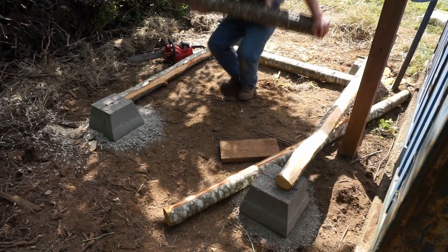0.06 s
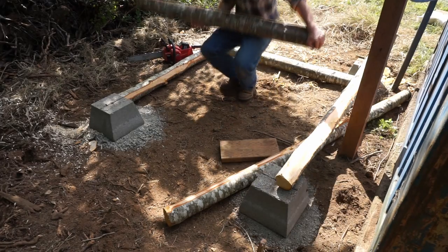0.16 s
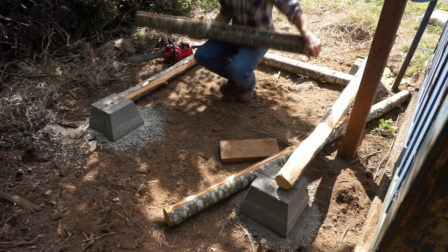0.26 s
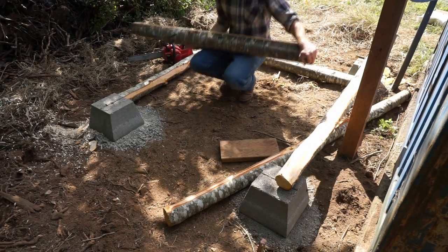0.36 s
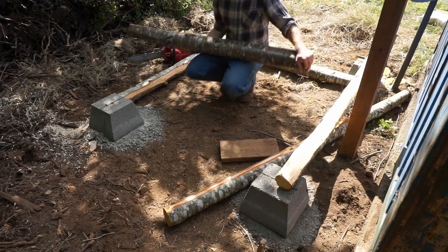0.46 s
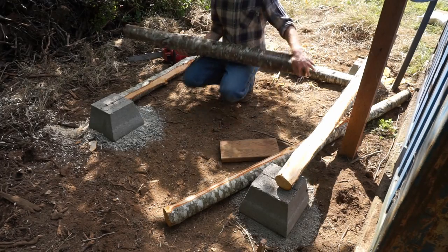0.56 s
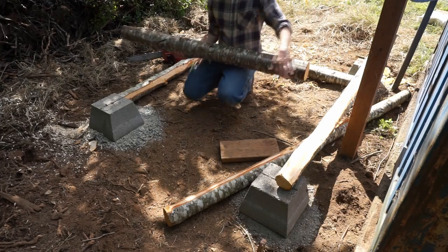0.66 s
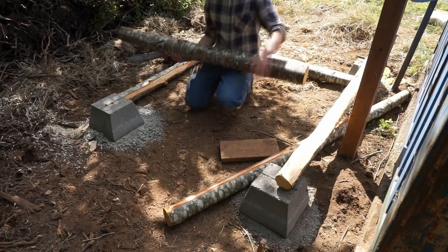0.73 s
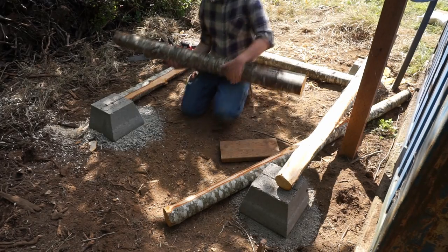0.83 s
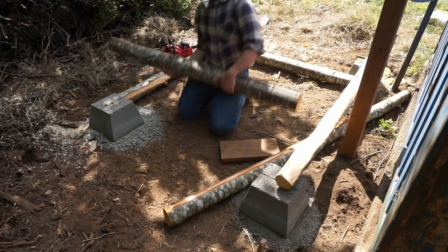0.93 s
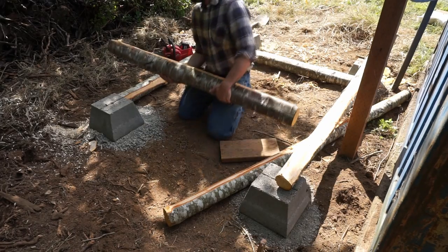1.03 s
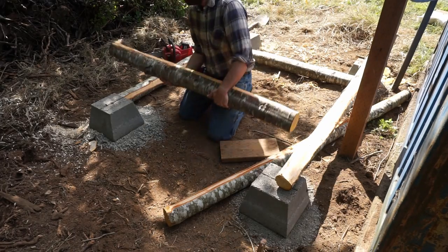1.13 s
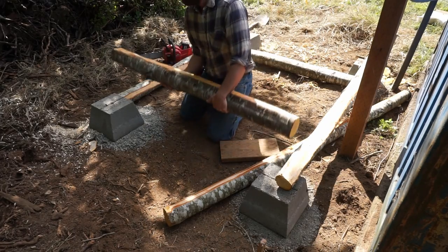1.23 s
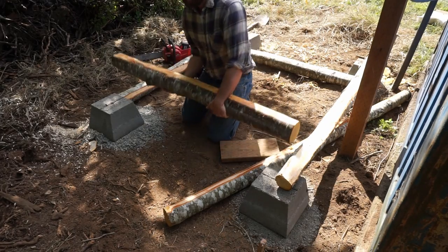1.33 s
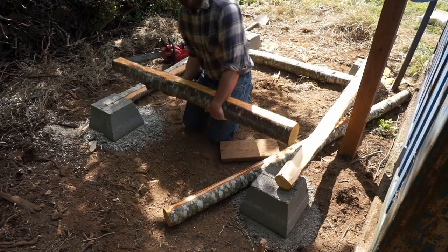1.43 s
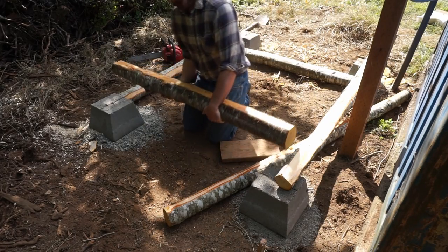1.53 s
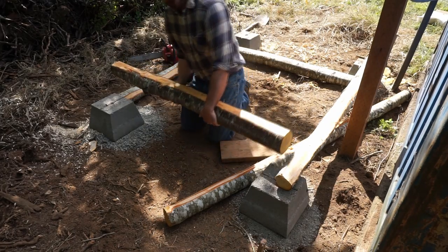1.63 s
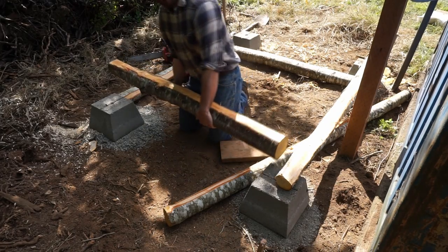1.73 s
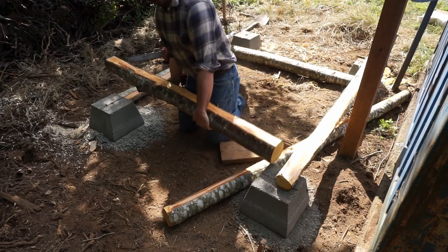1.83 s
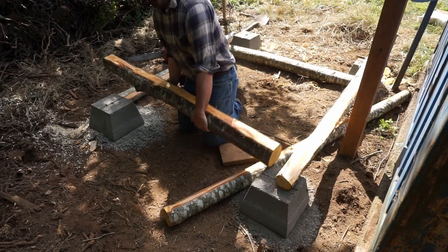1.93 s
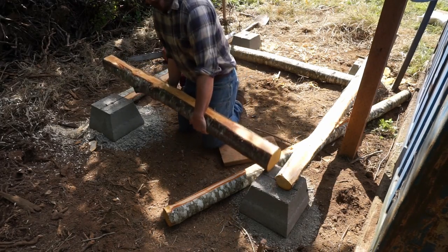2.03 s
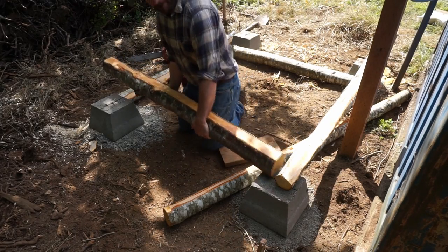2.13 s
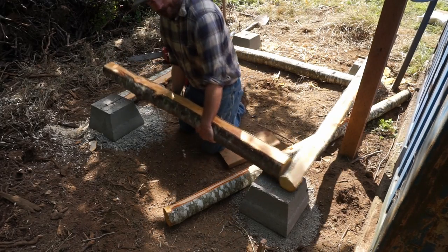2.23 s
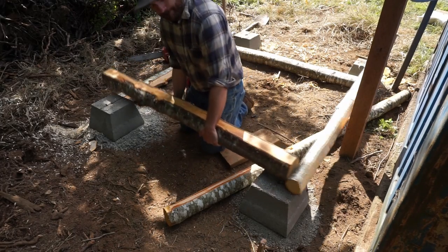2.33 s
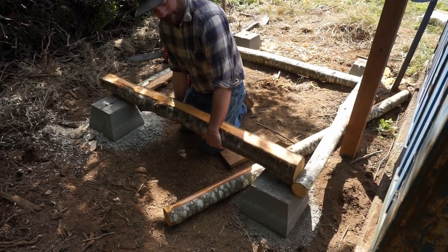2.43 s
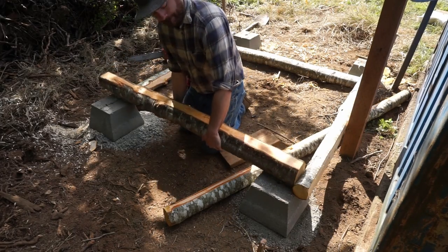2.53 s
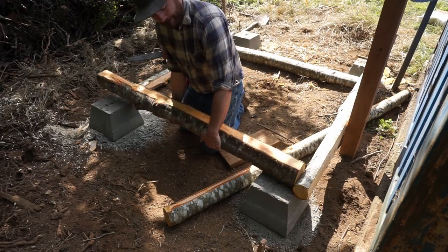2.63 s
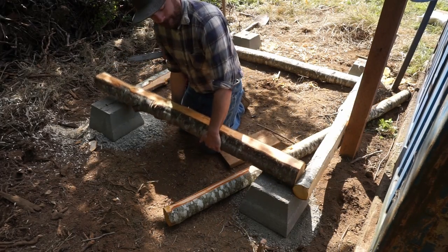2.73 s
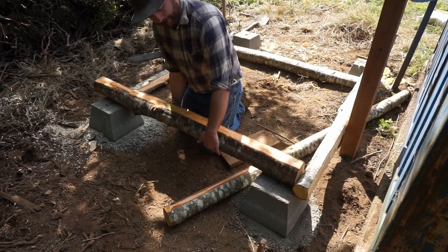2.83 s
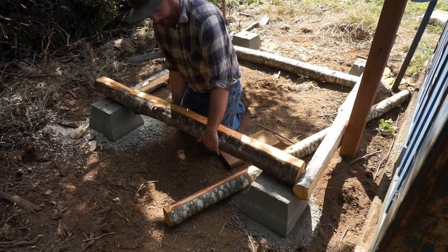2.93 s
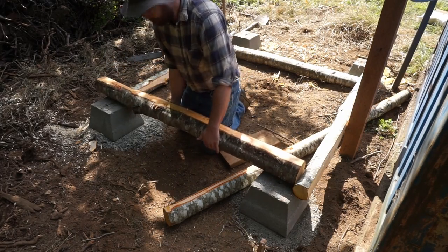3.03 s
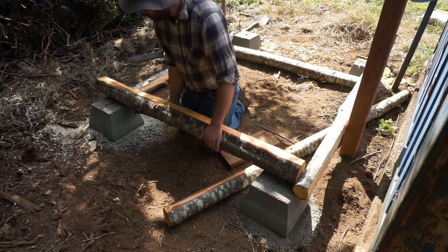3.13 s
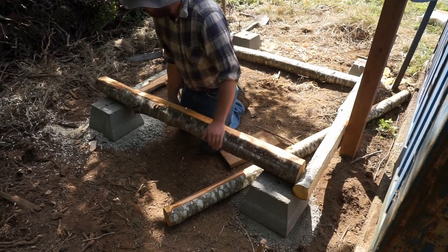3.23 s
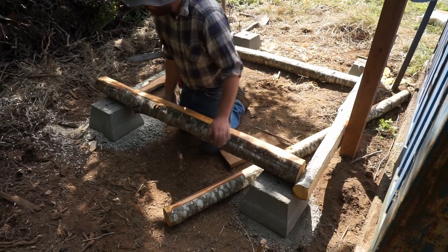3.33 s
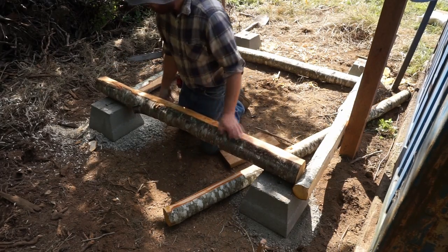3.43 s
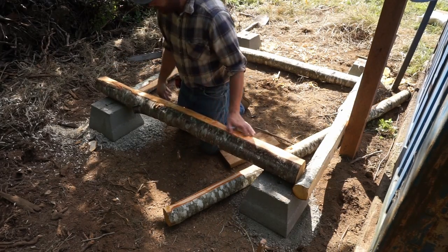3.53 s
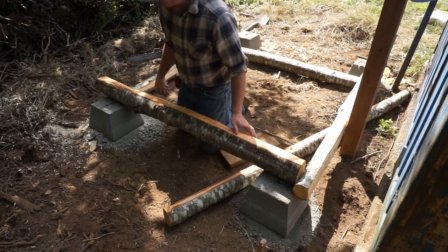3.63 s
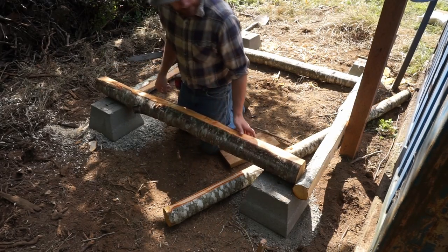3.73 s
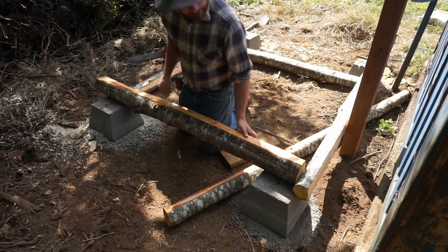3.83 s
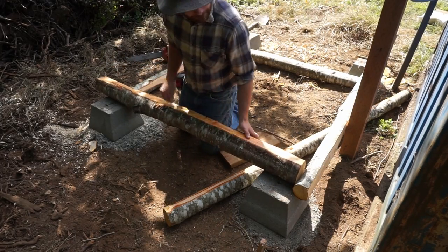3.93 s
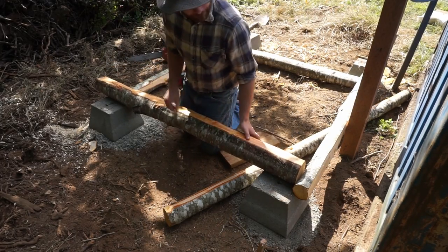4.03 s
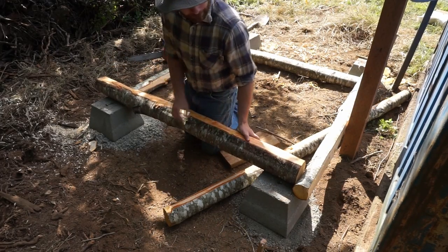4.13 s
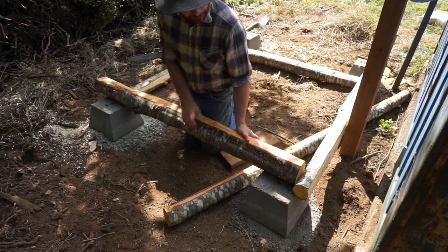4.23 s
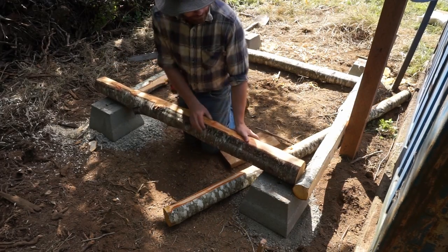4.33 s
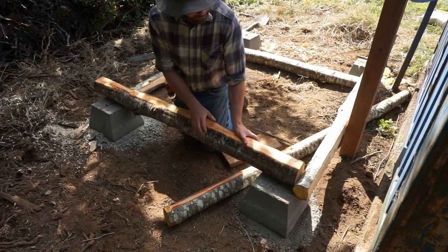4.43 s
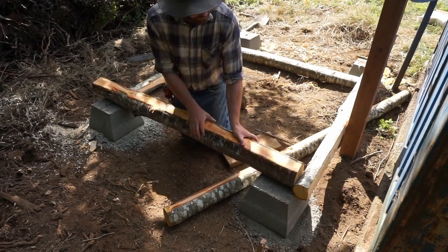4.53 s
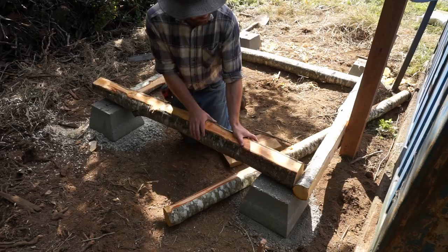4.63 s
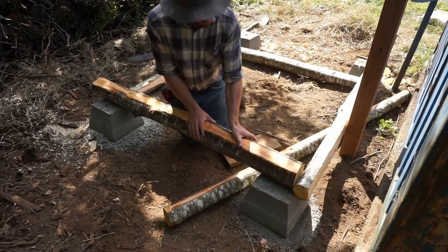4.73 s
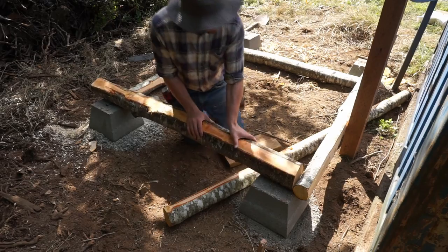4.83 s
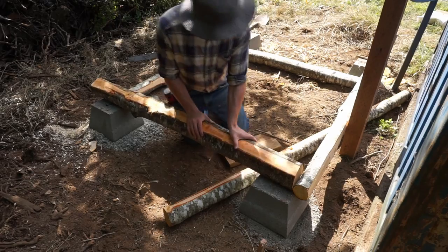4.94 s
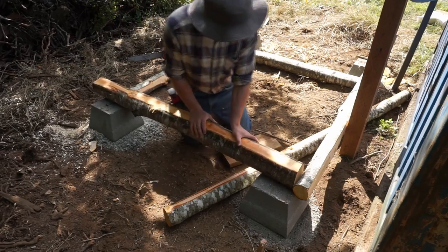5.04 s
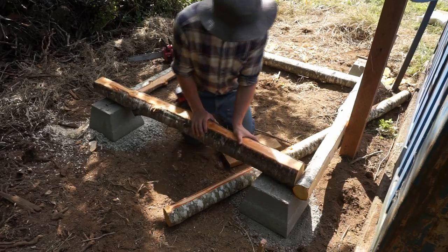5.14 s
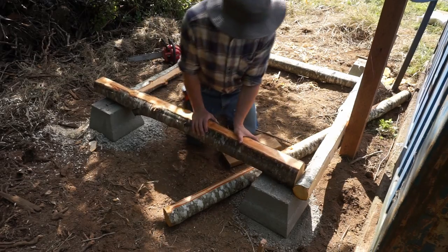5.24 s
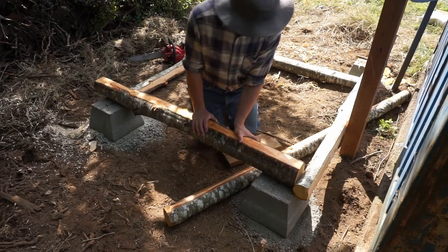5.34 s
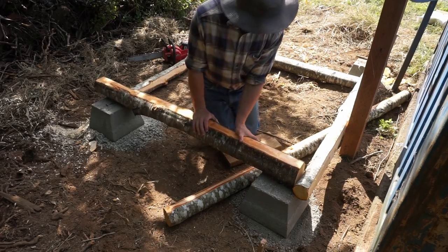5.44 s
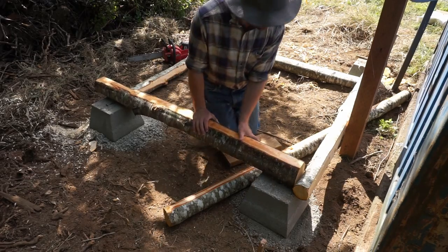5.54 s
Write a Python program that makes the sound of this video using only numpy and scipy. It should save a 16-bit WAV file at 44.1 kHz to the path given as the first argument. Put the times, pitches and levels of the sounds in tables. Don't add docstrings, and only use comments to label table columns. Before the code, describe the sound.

Close outdoor sound over low distant traffic and leaf hiss: boots scuff dry soil, a board taps, bark squeaks faintly in gripping hands and a twig snaps very loudly. A heavy log then knocks woodenly against another log, lands on concrete with a harder, gritty clack, and drops once more with a hollow ring. Soft palm rubs, bark creaks and ticks follow. Stereo microphone a few steps away, little echo.

```python
import sys
import numpy as np
from scipy import signal
from scipy.fft import rfft, irfft, next_fast_len
from scipy.io import wavfile
from scipy.ndimage import uniform_filter1d, map_coordinates

SR = 44100
rng = np.random.default_rng(int(sys.argv[2]) if len(sys.argv) > 2 else 0)


def gain_from_decibels(decibels):
    exponent = np.asarray(decibels, float) / 20
    return 10 ** exponent


def waveform_to_disk(signal):
    frames = np.transpose(np.atleast_2d(signal))
    scaled = np.clip(frames, -1, 1) * 32767
    samples = np.round(scaled).astype(np.int16)
    wavfile.write(sys.argv[1], SR, samples)


N = 246078
TOP_HZ = 16000
SIDES = np.array([[1], [-1]])


def unit(x):
    return x / np.sqrt(np.mean(x ** 2) + 1e-20)


def along(points, hz):
    f, v = np.transpose(points)
    return np.interp(np.log(hz + 1), np.log(f + 1), v)


def curves(rows):
    s, *cols = np.transpose(rows)
    return [np.interp(np.arange(N) / SR, s, c) for c in cols]


def wobble(rate):
    knots = rng.standard_normal(int(N * rate / SR) + 4)
    return map_coordinates(knots, [np.arange(N) * rate / SR])


def filtered(x, response):
    m = next_fast_len(N + SR // 2)
    return irfft(rfft(x, m) * response(np.fft.rfftfreq(m, 1 / SR)), m)[..., :N]


def strokes(rows, attack_s, release_s):
    s, hold, db, *more = np.transpose(rows)[:, :, None]
    t = np.arange(0, N / SR + .01, .001)
    outside = np.maximum((s - t) / attack_s, (t - s - hold) / release_s)
    level_db = db - 20 * np.maximum(outside, 0)
    gains = [np.sqrt(gain_from_decibels(2 * (level_db + over)).sum(0)) for over in [0, *more]]
    return [np.interp(np.arange(N) / SR, t, gain) for gain in gains]


def rush(spectrum, alike, patchy_db, grain_db=0.):
    white = rng.standard_normal((2, N)) * gain_from_decibels(grain_db * np.abs(wobble(900)))
    z = signal.stft(white, nperseg=512)[2]
    field = uniform_filter1d(rng.standard_normal(z.shape[1:]), size=6, axis=0)
    field = uniform_filter1d(field, size=10, axis=1)
    pair = signal.istft(z * gain_from_decibels(patchy_db * unit(field)), nperseg=512)[1][:, :N]

    def mid_side(hz):
        turn = np.arccos(np.clip(along(alike, hz), -1, 1)) / 2
        return gain_from_decibels(along(spectrum, hz)) * [np.cos(turn), np.sin(turn)]

    mid, side = filtered(pair, mid_side)
    return unit(np.array([mid + side, mid - side]))


def placed(x, pan_db, lag_us):
    # f/Hz, share of pan [0-1]
    aim = [(200, 0.017), (700, 0.22), (1300, 0.58), (2400, 0.79), (4400, 0.23), (15000, 0.33)]

    def ports(hz):
        late = np.exp(-1j * np.pi * np.maximum(hz - 2400, 0) * lag_us * 1e-6 * SIDES)
        return gain_from_decibels(pan_db / 2 * along(aim, hz) * SIDES) * late

    return filtered(x, ports)


def murmur():
    # t/s, level/dB
    traffic = [(0, -41.5), (.7, -42.5), (1.32, -41.5), (2.19, -42), (2.42, -41), (2.61, -45), (3.0, -45.5),
               (3.25, -46.5), (3.95, -45.5), (4.3, -43), (5.04, -41.5), (5.28, -44.5), (5.58, -45)]
    # f/Hz, level/dB per Hz
    traffic_spectrum = [(20, -56), (60, -56), (110, -57), (160, -32), (200, -21), (260, -16.5), (330, -7),
                        (500, -7.5), (750, -4), (1150, -7.5), (1500, -15.5), (2100, -22), (3200, -27.5),
                        (6000, -53)]
    # f/Hz, level/dB per Hz
    air_spectrum = [(800, -12), (2000, -1), (4000, -1), (5500, -3), (7500, -3.5), (11000, -2.5),
                    (15750, -4.5), (16000, -28)]
    # start t/s, hold/s, level/dB
    gusts = [
        (0, 0.19, -51),
        (.55, 0.16, -44.5),
        (1.1, 0.53, -52),
        (2.4, 0.22, -52),
        (5.0, .08, -61),
    ]
    # f/Hz, likeness [0-1]
    likeness = [(60, 0), (130, 0.73), (290, 0.74), (640, 0.68), (1410, 0.05), (3100, 0), (6820, 0.02),
                (15000, 0.3)]
    # f/Hz, level/dB
    lean = [(60, -6), (110, 10), (200, -0.5), (380, -2), (700, -5), (1290, -4), (2380, -3.5), (4400, -0.5),
            (8120, -0.5), (15000, -3)]
    far_db, = curves(traffic)
    hiss = gain_from_decibels(-50.5 + far_db - far_db.mean())
    leaves = strokes(gusts, attack_s=1.0, release_s=0.5)[0]
    far = rush(traffic_spectrum, likeness, patchy_db=0.78) * gain_from_decibels(far_db + 2.0 + 0.15 * wobble(11.0))
    air = rush(air_spectrum, likeness, patchy_db=1.6) * np.hypot(hiss, leaves)
    return filtered(far + air, lambda hz: gain_from_decibels(along(lean, hz) / 2 * SIDES))


def thuds():
    # start t/s, hold/s, level/dB
    landings = [
        (0, 0.027, -52.5),
        (.4, 0.033, -82),
        (.86, .09, -66),
        (1.63, 0.012, -61),
        (2.175, 0.043, -51.5),
        (2.26, 0.049, -38.5),
        (2.34, 0.056, -48),
        (2.48, 0.018, -36),
        (2.55, 0.15, -54),
        (2.846, 0.01, -42.5),
    ]
    # f/Hz, level/dB per Hz
    ground = [(25, -29), (55, -18), (110, -12), (170, -4.5), (300, -48)]
    weight = strokes(landings, attack_s=0.028, release_s=0.11)[0]
    return weight * rush(ground, [(30, 0.45), (120, 0.92)], patchy_db=3.5)


def snap(t, hz, t60, crack_db):
    wander = (hz / 9000) ** 1.84 * np.cumsum(rng.standard_normal(len(t))) * 0.473
    tone = np.sin(2 * np.pi * hz * t + wander) * (1 - np.exp(-t / 0.00051))
    band = signal.butter(2, [0.92 * hz, min(2.42 * hz, TOP_HZ)], "bandpass", fs=SR)
    spike = 4.1 * (t == 0)
    crack = gain_from_decibels(crack_db + 2.5) * signal.lfilter(*band, rng.standard_normal(len(t)) + spike)
    return gain_from_decibels(-60 * t / t60) * (tone + crack)


def snaps():
    # t/s, peak level/dB, ring f/Hz, t60/s, left-right/dB
    breaks = [(.018, -24.5, 2470, 0.03, 6), (.0197, -9, 640, 0.012, -1.5), (.0265, -10, 727, 0.02, 3),
              (.001, -25, 1100, 0.012, 0), (.0148, -15.5, 1320, 0.0075, 2), (.027, -24, 1780, 0.041, 3),
              (.3992, -17.5, 5370, 0.0099, 2), (.3996, -16, 1630, 0.0051, 2),
              (.4003, -22.5, 2720, 0.012, 3), (.941, -31, 11530, 0.067, 0),
              (.9475, -19.5, 11900, 0.055, -6), (.955, -19, 587, 0.019, 3),
              (.9556, -15.5, 6840, 0.0087, 11), (.9562, -20, 4740, 0.0076, 0),
              (.9565, -20, 1410, 0.0077, 6), (.9445, -16.5, 810, 0.014, 2), (.961, -22, 1500, .03, 5),
              (.968, -40, 2880, 0.29, 6), (2.167, -28, 3800, 0.018, -2), (2.4755, -31, 2390, 0.032, -6),
              (2.476, -35, 5000, .03, -8), (2.484, -20, 4810, 0.017, -22),
              (2.4915, -21.5, 4450, 0.029, -15), (2.492, -26, 6200, .012, -10),
              (2.537, -27, 4270, .02, -14), (2.502, -18.5, 4410, 0.033, -17), (3.596, -50, 14100, .09, -15),
              (5.186, -25.5, 1160, 0.013, 4)]
    # t/s, peak level/dB,
    # ring f/Hz, t60/s, left-right/dB
    twigs = [(.015, -14, 2920, 0.0035, -5), (.3998, -12, 2130, 0.0099, -1.5), (.891, -22.5, 3300, 0.014, 2),
             (.942, -26, 2500, 0.01, 9), (.9475, -24, 2600, .012, 0), (.952, -22, 2300, 0.013, -2),
             (.9558, 3, 2400, 0.0047, 0), (.9566, 3.5, 2590, 0.0028, 4), (.9613, -9, 2900, .005, -3),
             (.9617, -22, 4100, .008, -8), (.9635, -17, 2840, 0.016, -6), (.968, -24, 2680, .01, -4),
             (.974, -31, 2530, 0.018, -3), (.978, -32, 2890, .015, -1), (.989, -25, 2600, .01, -3),
             (.989, -26, 3530, 0.011, -3), (2.146, -35, 2840, .017, -3), (2.17, -28, 2630, 0.03, 2),
             (2.505, -17, 5920, 0.019, -13)]
    # t/s, peak level/dB, ring f/Hz, t60/s, left-right/dB
    taps = [
        (.042, -25, 800, 0.01, 0),
        (.0455, -24, 435, 0.047, 2),
        (.346, -23, 536, 0.045, 1),
        (.3996, -15, 480, 0.024, 3.5),
        (.3994, -10, 1100, 0.019, 4),
        (.891, -14, 695, 0.0067, 2),
        (2.1706, -14, 695, 0.023, 1),
        (2.8427, -9, 615, .016, 0.5),
        (2.8463, -5, 365, 0.014, -1.5),
    ]
    # t/s, peak level/dB, left-right/dB
    clicks = [
        (0.3984, -22, 0),
        (.9558, -12, -6),
        (2.5005, -14, -8),
        (2.506, -17, -5),
        (2.1695, -26, -6),
        (5.1255, -32, -4),
        (5.142, -30, -6),
        (5.1478, -26, -4),
        (5.1832, -6.5, -9),
        (5.1857, -16, 0),
    ]
    # t/s, peak level/dB, ring f/Hz, left-right/dB
    flake_ticks = [(1.838, -34, 10200, -9), (2.113, -41, 10900, 17), (2.168, -14.5, 13100, -3),
                   (2.361, -38.5, 12000, -1.5), (2.366, -23, 12260, -23), (2.39, -30, 12800, -13),
                   (4.76, -32, 13200, -13), (4.915, -37, 12800, -16), (5.125, -26, 11900, 11),
                   (5.142, -24, 12100, -13), (5.1453, -23, 14200, -15), (5.147, -22, 13500, -5),
                   (5.149, -17, 12800, 1), (5.151, -27, 11900, -5), (5.183, -14, 13400, -6),
                   (5.184, -15, 13400, -10), (5.1854, -10.5, 13500, -5), (5.1915, -25, 11000, -5)]
    flakes = [(s, db, hz, 0.0048, pan_db) for s, db, hz, pan_db in flake_ticks]
    out, t = np.zeros((2, N + SR)), np.arange(SR // 10) / SR
    for rows, crack_db in [(taps, -9.5), (twigs, -14), (breaks, -5.5), (flakes, -3)]:
        for s, db, hz, t60, pan_db in rows:
            at = slice(round(s * SR), round(s * SR) + len(t))
            out[:, at] += gain_from_decibels(db + pan_db / 2 * SIDES) * snap(t, hz, t60, crack_db)
    thin = signal.butter(1, 1810, "highpass", fs=SR)
    for s, db, pan_db in clicks:
        at = slice(round(s * SR), round(s * SR) + len(t))
        dust = 0.43 * gain_from_decibels(-60 * t / 0.002) * rng.standard_normal(len(t))
        out[:, at] += gain_from_decibels(db + pan_db / 2 * SIDES) * signal.lfilter(*thin, (t == 0) + dust)
    return placed(out[:, :N], pan_db=-13.5, lag_us=34)


def squeaks():
    # start t/s, hold/s, level/dB, lowest hollow over the upper ones/dB
    squeezes = [
        (.535, 0.075, -45.5, 2),
        (.76, 0.045, -49.5, -5),
        (1.155, 0.16, -49, -8),
    ]
    # start t/s, hold/s, level/dB
    creaks = [
        (3.8, 0.16, -55),
        (4.44, 0.25, -49),
        (4.79, 0.045, -44),
        (5.02, 0.12, -45),
        (5.18, 0.0065, -43.5),
    ]
    # f/Hz, width/Hz, level/dB
    hollows = [(1880, 300, 0), (2700, 420, 0), (3300, 420, -5)]
    # f/Hz, level/dB per Hz
    bark_spectrum = [(900, -7), (1600, 2), (2100, -0.5), (3000, -2.5), (4500, -13.5)]

    def hollow(peaks):
        return lambda f: sum(gain_from_decibels(db) * 1j * f * w / (c * c - f * f + 1j * f * w) for c, w, db in peaks)

    bark = rush(bark_spectrum, [(2000, 0.64)], patchy_db=2.0, grain_db=1.5)
    upper, lowest = strokes(squeezes, attack_s=0.024, release_s=0.07)
    squeezed = upper * unit(filtered(bark, hollow(hollows[1:])))
    squeezed = squeezed + lowest * unit(filtered(bark, hollow(hollows[:1])))
    return squeezed + strokes(creaks, attack_s=0.058, release_s=0.15)[0] * bark


def scuffs():
    # start t/s, hold/s, hiss level/dB, crunch over hiss/dB
    boots = [(.012, 0.032, -41.5, -0.5), (.11, .26, -50, -13), (.44, 0.1, -46.5, -8),
             (.56, 0.12, -42, -3.5), (.72, .12, -46.5, -3.5), (.89, 0.032, -46.5, 0),
             (.965, 0.035, -41.5, 1.5), (1.065, 0.022, -42.5, -6), (1.155, 0.11, -49, 1),
             (1.585, 0.051, -45, 0.5), (1.7, 0.14, -56, -9), (1.86, 0.078, -42, -6.5),
             (2.12, 0.017, -48, 0.5), (2.236, 0.12, -45.5, 1.5), (2.38, 0.033, -53, -11),
             (2.5, 0.038, -37, 4), (2.58, 0.091, -53, 2.5), (2.79, 0.057, -44, -6)]
    # start t/s, hold/s, hiss level/dB, crunch over hiss/dB
    palms = [(2.995, 0.023, -60, -4), (3.26, 0.05, -55.5, -14), (3.497, 0.018, -54.5, -12),
             (3.595, 0.013, -50, -17), (3.643, .04, -54, -17), (3.865, 0.14, -63, 5), (4.098, 0.3, -57, -9),
             (4.24, 0.022, -58, 5), (4.546, 0.039, -45, -9), (4.755, 0.13, -52.5, -17),
             (4.82, 0.0091, -45, -14), (5.02, .04, -51, -12), (5.124, 0.015, -46.5, 1),
             (5.19, 0.04, -49, -3), (5.5, .01, -63, -12)]
    # f/Hz, level/dB per Hz
    soil_spectrum = [(3000, -30), (6000, -7), (8000, -3), (11000, 0), (13500, -1), (15750, -1),
                     (16000, -30)]
    sleeve_spectrum = [(5000, -23), (9000, -4.5), (12000, -1.5), (15750, -3), (16000, -30)]
    crunch_spectrum = [(300, -18), (1000, 0.5), (2500, 3), (5000, -2), (8000, -16), (12000, -42)]
    soil, coarse = strokes(boots, attack_s=0.024, release_s=0.087)
    skin, rough = strokes(palms, attack_s=0.03, release_s=0.062)
    hiss = rush(soil_spectrum, [(5000, 0.83)], patchy_db=2.0, grain_db=2.5)
    hiss = hiss * soil * gain_from_decibels(1.1 * wobble(27.05))
    swish = rush(sleeve_spectrum, [(5000, 0.56)], patchy_db=2.0, grain_db=5.5)
    swish = swish * skin * gain_from_decibels(1.1 * wobble(40))
    crunch = rush(crunch_spectrum, [(1000, 1.0), (5000, 0.18)], patchy_db=0.5, grain_db=3.0)
    crunch = crunch * (coarse + rough) * gain_from_decibels(1.5 + 0.82 * wobble(24.7))
    return placed(hiss + swish + crunch + squeaks(), pan_db=-5.5, lag_us=22.6)


def ring(force, modes):
    t = np.arange(SR // 2) / SR
    body = np.zeros(len(t))
    for k, (hz, db, t60) in enumerate(modes):
        body += (-1) ** k * gain_from_decibels(db - 60 * t / t60) * np.sin(2 * np.pi * hz * t)
    return signal.fftconvolve(force, body)[:N]


def blows(let_go_s):
    # t/s, into carried log level/dB, into frame log level/dB, contact/ms
    on_wood = [(2.17, -16.5, -54, 0.39), (2.240, -19, -29, 0.36), (2.247, -23, -10, 1.7),
               (2.257, -22, -5.5, 1.32), (2.266, -7.5, -32, 1.03), (2.283, -4.5, -41, 1.37),
               (2.2888, -7, -40, 1.4), (2.2935, -30, -7, 0.81), (2.324, -16, -35, 1.7),
               (2.471, -26, -17.5, 0.66), (2.475, -11.5, -19, 0.82), (2.598, -35, -10, 1.6),
               (2.610, -37.5, -26, 1.6), (2.623, -20, -32, 0.67), (2.8445, -20, -42, 0.67),
               (2.8455, -11, -35, 0.76)]
    # t/s, into block level/dB, contact/ms, grit level/dB
    on_stone = [(2.484, -8, .17, -14.5), (2.4885, -9.5, 0.19, -19), (2.491, -14, 0.23, -17),
                (2.4953, -17, 0.18, -25.5), (2.498, -29, 0.31, -20.5), (2.503, -21, 0.38, -16.5),
                (2.506, -20, 0.11, -20.5), (2.5099, -22, 0.36, -30), (2.515, -28, 0.39, -32),
                (2.536, -17, 0.18, -24.5), (2.5395, -20, 0.22, -36)]
    contacts = []
    for s, a, b, ms in on_wood:
        grit_db = max(a, b) - 1 - 21 * ms
        contacts.append((s, [gain_from_decibels(a), gain_from_decibels(b), 0], ms, grit_db))
    for s, db, ms, grit_db in on_stone:
        contacts.append((s, [gain_from_decibels(db - 17), 0, gain_from_decibels(db)], ms, grit_db))
    force, gate, t = np.zeros((3, N)), np.zeros(N), np.arange(SR // 10) / SR
    crumble = gain_from_decibels(-60 * t / 0.029) + 0.061 * gain_from_decibels(-60 * t / 0.08)
    for s, shares, ms, grit_db in contacts:
        push = np.sin(np.pi * np.clip(t / (2 * ms / 1000), 0, 1)) ** 2
        at = slice(round(s * SR), round(s * SR) + len(t))
        force[:, at] += np.outer(shares, push / push.sum())
        gate[at] += gain_from_decibels(grit_db - 0.5 * (s > let_go_s)) * crumble
    return force, gate


def knocks():
    # start t/s, hold/s, level/dB
    grip = [
        (.07, 0.35, -42),
        (.8, 0.094, -48),
    ]
    # start t/s, hold/s, on wood level/dB, on stone over wood/dB
    grind = [
        (2.262, 0.017, -19.5, -15),
        (2.478, 0.018, -42, 7),
        (2.52, 0.056, -44, 9),
        (2.588, 0.019, -32.5, -1.5),
    ]
    # f/Hz, level/dB, t60/s
    held_modes = [(173, -19, 0.042), (480, -10, 0.022), (626, -9, 0.16), (681, -7, 0.09), (950, -6.5, 0.13),
                  (1213, -7.5, 0.081), (1500, -12, 0.082), (1600, -12, 0.08), (2500, -14, 0.039),
                  (3700, -21, 0.022)]
    # f/Hz, level/dB, t60/s
    free_modes = [(173, -10, 0.046), (480, -3, 0.026), (636, -16, 0.27), (668, -14, 0.31), (985, 0, 0.097),
                  (1210, -2, 0.12), (1490, 4, 0.15), (1870, -21, 0.14), (2530, -16, 0.039),
                  (3700, -18, 0.022)]
    # f/Hz, level/dB, t60/s
    bending = [(365, 0.5, 0.29)]
    # f/Hz, level/dB, t60/s
    frame_modes = [(158.3, -22.5, 0.15), (271, -14.5, .12), (417, -19, 0.3), (999, -14.5, 0.18),
                   (1202, -17, 0.16), (556.5, -5, 0.21), (618, -6, .17)]
    # f/Hz, level/dB, t60/s
    block_modes = [(300, -25, 0.082), (449, -12, 0.069), (727, -16.5, 0.075), (1446, -12, 0.1),
                   (1657, -8, 0.059), (1732, -1.5, 0.046), (2260, -15, 0.024), (2920, -31, 0.12),
                   (3530, -8, 0.09), (4430, -5, .05), (4660, -20, 0.054), (6200, 4, 0.009)]
    # f/Hz, level/dB per Hz
    grit_spectrum = [(150, 2), (450, 8), (1000, -0.5), (2200, -7.5), (4500, -10.5), (7000, -14.5),
                     (10000, -13.5), (15700, -17), (16400, -45)]
    let_go_s = 2.8
    force, gate = blows(let_go_s)
    drag = rng.standard_normal((3, N)) * gain_from_decibels(6.5 * np.abs(wobble(300)))
    wood, stone = strokes(grind, attack_s=0.016, release_s=0.046)
    shift = gain_from_decibels(-39.0) * strokes(grip, attack_s=0.42, release_s=0.76)[0]
    force += drag * [0.3 * shift + gain_from_decibels(-35.0) * wood, gain_from_decibels(-30.5) * wood, gain_from_decibels(-40.0) * stone]
    grit = (gate + stone) * rush(grit_spectrum, [(500, 0.98), (8000, 0.23)], patchy_db=3.0, grain_db=3.5)

    in_hand = np.arange(N) < let_go_s * SR
    gripped, free = in_hand * force[0], ~in_hand * force[0]
    held_bend = [(hz, db, 0.21) for hz, db, _ in bending]
    carried = ring(free, free_modes) + ring(gripped, held_modes)
    carried = carried + ring(gain_from_decibels(-9.5) * gripped, held_bend)
    carried = carried + ring(free + 1.2 * shift * drag[0], bending)
    return (placed(carried, pan_db=-1.0, lag_us=-15)
            + placed(ring(force[1], frame_modes), pan_db=-18.0, lag_us=15)
            + placed(ring(force[2], block_modes) + grit, pan_db=-20.0, lag_us=140))


def yard(x):
    # f/Hz, t60/s
    decay = [(200, 0.097), (2000, 0.1), (10000, 0.03)]
    hz, t, z = signal.stft(rng.standard_normal((2, SR // 3)), SR, nperseg=256)
    tail = signal.istft(z * gain_from_decibels(-60 * t / along(decay, hz)[:, None]), SR, nperseg=256)[1]
    late = np.pad(x, ((0, 0), (260, 0)))
    return signal.fftconvolve(late, tail / np.linalg.norm(tail[0]), axes=1)[:, :N]


def scene():
    hits = knocks() + snaps()
    near = hits + gain_from_decibels(-19.0) * yard(hits) + scuffs()
    wind_filter = signal.butter(2, 185, "highpass", fs=SR, output="sos")
    return signal.sosfilt(wind_filter, near) + thuds() + murmur()


def roll_off(x):
    return signal.sosfilt(signal.butter(12, 16700, fs=SR, output="sos"), x)


def record(dry):
    mix = filtered(np.clip(dry, -.97, .97), lambda hz: hz < TOP_HZ)
    return roll_off(mix)


dry = scene()
out = record(dry)
waveform_to_disk(out)
```